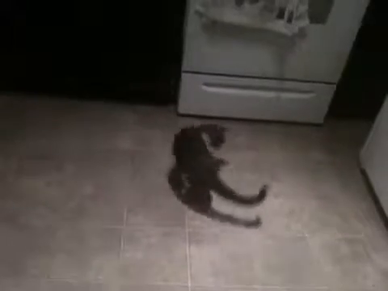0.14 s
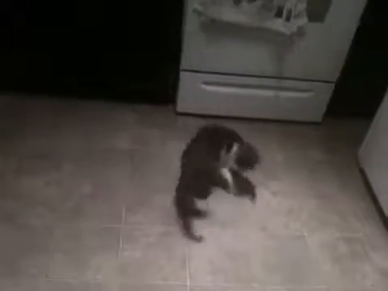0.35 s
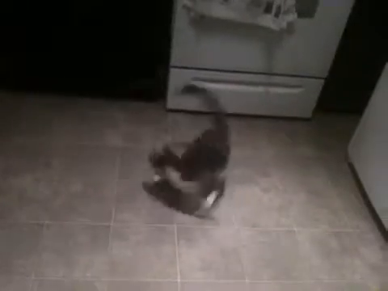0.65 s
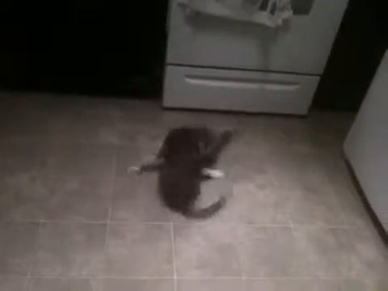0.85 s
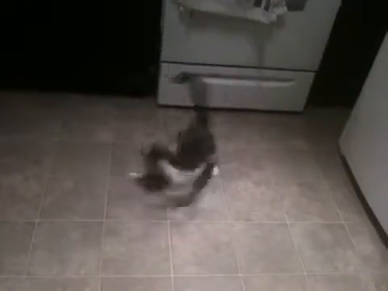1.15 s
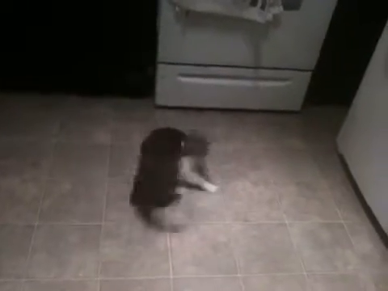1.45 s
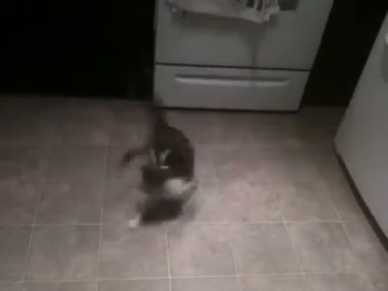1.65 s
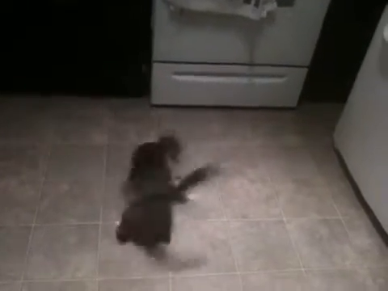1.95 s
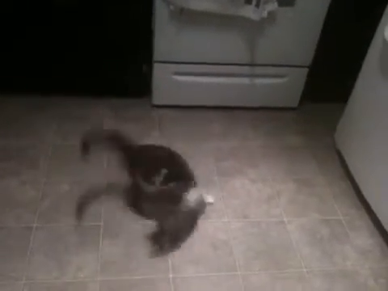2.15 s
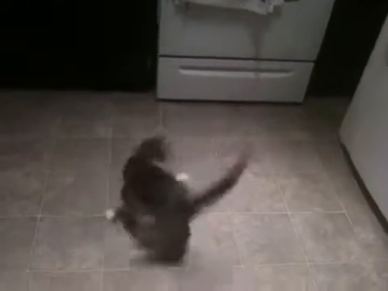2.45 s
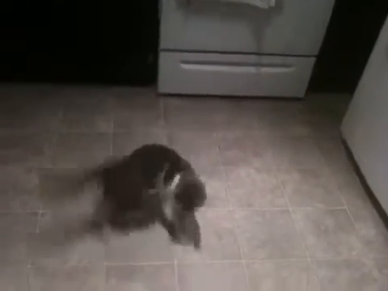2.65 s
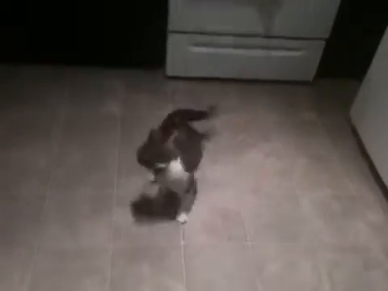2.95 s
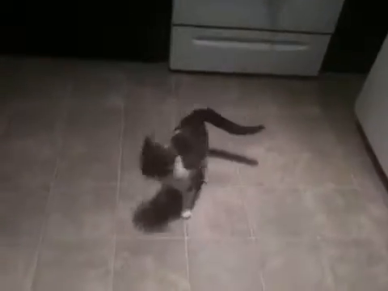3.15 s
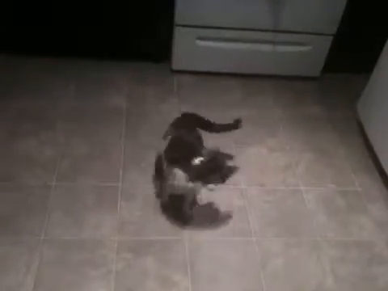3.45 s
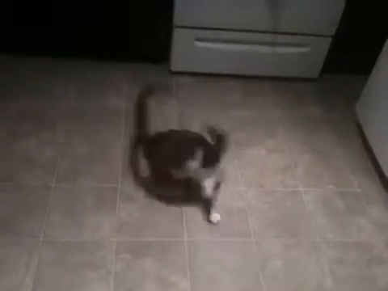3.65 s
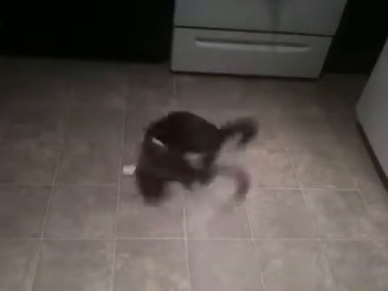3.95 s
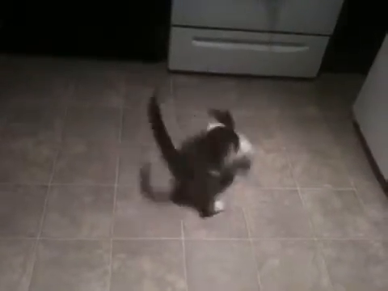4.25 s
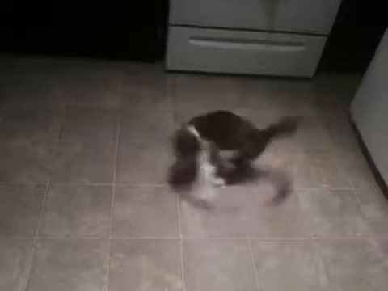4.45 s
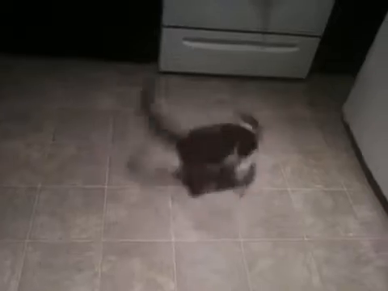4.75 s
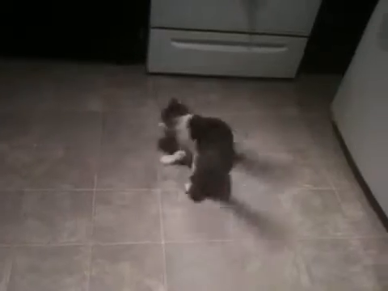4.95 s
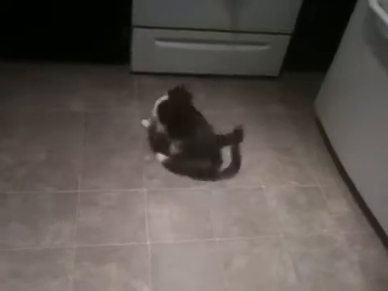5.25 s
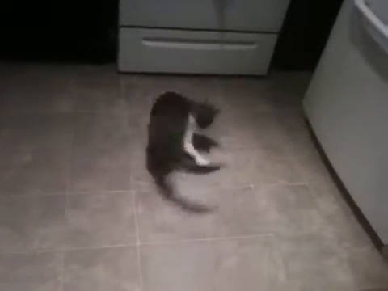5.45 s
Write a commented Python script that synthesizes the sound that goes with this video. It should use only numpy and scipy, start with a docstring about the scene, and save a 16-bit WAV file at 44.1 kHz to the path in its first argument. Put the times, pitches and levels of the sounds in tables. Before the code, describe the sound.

A high, tinny collar bell jingles in quick uneven flurries while a cat's paws patter, thud and scuff on a hard kitchen floor.

```python
"""A cat's collar bell jingles as it chases its tail on a tiled kitchen floor: pellet blows excite split modes.
Claws and the bell's pellet tick as snaps with short noise scatters; paws thud by ringing floor modes.
Pads scuff as grainy friction noise; a squeak and a late squeal are wavering tones.
Three alternating reverberant tails give the room, and coloured hiss, mains hum, a thin electric whine
and the microphone's faint rumble lie beneath."""
import sys
import numpy as np
from scipy import signal
from scipy.fft import rfft, irfft
from scipy.io import wavfile
from scipy.ndimage import uniform_filter1d

SR = 44100
rng = np.random.default_rng(int(sys.argv[2]) if len(sys.argv) > 2 else 0)


def voltage_ratio(decibels):
    """Convert decibels (scalar or array-like) to amplitude ratios, 20 dB per decade."""
    exponent = np.asarray(decibels, float) / 20
    return 10 ** exponent


def digitize_waveform(pressure):
    """Quantize a signal to 16-bit integers and store it at the path in sys.argv[1].

    Rows of a 2-D input are taken as channels; values are limited to [-1, 1].
    """
    field = np.atleast_2d(pressure).T
    bounded = np.clip(field, -1, 1)
    quanta = np.round(bounded * 32767).astype(np.int16)
    wavfile.write(sys.argv[1], SR, quanta)


N = 246959
T = np.arange(N) / SR

# shaking of the pellet between clear blows, also followed by the shuffle: start_s, level_db
SHAKING = [(0.25, -81), (0.44, -64.5), (0.62, -78), (0.9, -66.5), (1.15, -52.5), (1.68, -49.5), (1.84, -59),
           (2.02, -67), (2.22, -49), (2.42, -59), (2.55, -41.5), (3.08, -67), (3.29, -55.5), (3.55, -59),
           (3.78, -49.5), (3.89, -63), (4.0, -55), (4.26, -61), (4.42, -49.5), (4.84, -61), (4.96, -70.5),
           (5.07, -61.5), (5.2, -88), (5.6, -74)]
# spectrum of a small hard tick: frequency_hz, level_db
TICK_COLOUR = [(3000, -19), (5000, 15), (6500, 26), (8000, 20.5), (11000, 6), (14000, 6), (17000, -44)]


def evened(x):
    """Normalization: scales a signal to unit rms."""
    return x / np.sqrt(np.mean(x ** 2) + 1e-20)


def wander(size):
    """Low-pass noise: a moving average over size samples leaves slow random motion, rms 1."""
    return evened(uniform_filter1d(rng.standard_normal(N), size))


def read(points, hz):
    """Interpolation: reads a spectrum table on a log-frequency axis."""
    f, value = np.transpose(points)
    return np.interp(np.log(hz + 1), np.log(f + 1), value)


def curve_gain(rows):
    """Envelope: a level curve as gain per sample, silent outside its span."""
    s, db = np.transpose(rows)
    return voltage_ratio(np.interp(T, s, db, left=-200, right=-200))


def coloured(colour, size):
    """Spectral shaping: white noise filtered by a spectrum table, rms 1."""
    hz = np.fft.rfftfreq(size, 1 / SR)
    spectrum = rfft(rng.standard_normal(size)) * voltage_ratio(read(colour, hz))
    return evened(irfft(spectrum, size))


def ring(hz, db, t60, rise):
    """Damped resonance: one mode starts softly and decays exponentially."""
    t = np.arange(SR // 4) / SR
    decay = voltage_ratio(db - 60 * t / t60)
    onset = 1 - np.exp(-(t / rise) ** 2)
    return decay * onset * np.sin(2 * np.pi * hz * t)


def add(mix, s, sound):
    """Superposition: adds a sound at a time in seconds."""
    part = mix[round(s * SR):][:len(sound)]
    part += sound[:len(part)]


def burst(colour, t60):
    """Decaying noise: a short puff of coloured noise."""
    return coloured(colour, size=4096) * voltage_ratio(-60 * np.arange(4096) / SR / t60)


def background():
    """Stationary noise and tones: hiss with room air, a fuzzy whine and slightly wavering hum."""
    # hiss and room air: frequency_hz, level_db
    hiss = [(24, -80), (40, -29), (107, -5), (174, 3.5), (213, -3), (570, -6), (631, -4.5), (698, -13.5),
            (923, -12.5), (1650, -16), (2350, -15.5), (5160, -18), (17000, -20)]
    # narrow-band electric whine: frequency_hz, level_db
    whine = [(14800, -40), (14950, -12), (14970, 0), (15000, -10), (15030, 0), (15090, -10), (15250, -40)]
    # mains hum harmonics: frequency_hz, level_db
    hum = [(120, -85.5), (180, -100), (240, -90.5)]
    out = voltage_ratio(-69.5) * coloured(hiss, N) + voltage_ratio(-82.0) * coloured(whine, N)
    for hz, db in hum:
        waver_db = 3.6 * wander(3000)
        out += np.sqrt(2) * voltage_ratio(db + waver_db) * np.sin(2 * np.pi * (hz * T + rng.random()))
    return out


def bell():
    """Modal excitation: each blow drives the modes by its own shares, then small random blows follow."""
    # clear blows of the pellet: start_s, level_db, upper_twin_db (drive re level_db)
    strikes = [(0.2902, -48, -5), (0.5587, -49.5, -5), (0.682, -33.5, 12.5), (0.6977, -32.5, -6),
               (0.7446, -32.5, 4), (0.7879, -32.5, 4), (0.8017, -36, 8), (0.9298, -46, 11),
               (1.0072, -26, -3), (1.0296, -26, -4), (1.0361, -28, 0), (1.0534, -29, -1), (1.0822, -29, 3),
               (1.1504, -16, -21), (1.1968, -22.5, -10), (1.2268, -39, -10), (1.2571, -24.5, -10),
               (1.326, -27, -4), (1.3471, -31, 12), (1.3581, -28, -15), (1.3895, -38, -21),
               (1.4703, -32.5, 0), (1.5206, -29, -1), (1.6434, -33, -11), (1.6592, -29.5, -5),
               (1.752, -27.5, -12), (1.9435, -54, -1), (1.759, -23, 5.5), (2.0058, -33, -10),
               (2.0488, -25.5, 5), (2.0567, -23, -5), (2.1859, -35, -8), (2.2035, -22, -13),
               (2.2086, -23.5, -16), (2.2299, -32, -16), (2.258, -24, 9), (2.2892, -18.5, 1.5),
               (2.3842, -20, 11), (2.3879, -21, 12), (2.3935, -26.5, 19), (2.4204, -32, -15),
               (2.4449, -25.5, 18), (2.4606, -53, -6), (2.5401, -29.5, -33), (2.7322, -26.5, 4),
               (2.7701, -24, -19), (2.8011, -25, -16), (2.932, -27.5, 6.5), (2.964, -32, 1),
               (2.9885, -25, -14), (2.994, -22, -12), (3.0507, -24.5, -13), (3.0663, -29, -4),
               (3.1728, -32, -12), (3.1894, -29.5, -20), (3.2384, -22.5, 4), (3.2737, -25.5, -8),
               (3.3053, -29, -16), (3.4491, -31.5, -6), (3.5154, -33, -3), (3.5443, -32, -11),
               (3.7159, -24.5, -14), (3.7261, -33.5, -17), (3.8857, -27.5, 3.5), (3.9236, -27, 0),
               (3.9884, -31, 4), (4.0397, -28, -5), (4.1537, -41, -8), (4.2209, -31.5, -2),
               (4.2388, -28.5, -8), (4.3881, -24, -3.5), (4.4128, -21.5, 1), (4.443, -29, 8),
               (4.497, -31.5, 4), (4.5317, -38, -2), (4.6271, -38, -2), (4.6396, -32, -14),
               (4.751, -41.5, -3), (4.777, -44, 9), (5.008, -53, -5), (5.05, -40.5, -5), (5.4181, -53, -3)]
    # the slit shell splits each mode in two: frequency_hz, level_db, ring_time_factor
    modes = [(6480, 0, 1.), (6800, -1, .9), (15030, -32, 1.5), (15420, -36, 1.2)]
    even_t60_s, halving_db = 0.02, 13  # the ring time halves as the upper twin gains halving_db
    out, shaking = np.zeros(N), curve_gain(SHAKING)
    for s, db, twin_db in strikes:
        t60 = even_t60_s * 2 ** (-twin_db / halving_db)
        upper_pair_db = 8.1 * rng.standard_normal(2)
        drives = db + np.array([0, twin_db, *upper_pair_db])
        for (hz, own_db, factor), drive_db in zip(modes, drives):
            add(out, s, ring(hz, own_db + drive_db, t60 * factor, rise=0.0008))
        # the pellet bounces on after the blow
        add(shaking, s + 0.004, voltage_ratio(db - 7 - 60 * T[:SR // 4] / 0.05))

    # random impacts, 700 per second on average
    hits = (rng.random(N) < 700 / SR) * voltage_ratio(3.2 * np.minimum(rng.exponential(1, N), 2))
    small = voltage_ratio(-20) * evened(hits) * shaking
    shares_db = [1.0, -3.0, -1.0, -13]
    for (hz, own_db, factor), share_db in zip(modes, shares_db):
        spot = rng.standard_normal(N)  # where the pellet lands sets how much each mode gets
        mode = ring(hz, own_db + share_db, 0.022 * factor, 0.0003)
        out += signal.oaconvolve(small * spot, mode)[:N]
    clicks = signal.oaconvolve(small, burst(TICK_COLOUR, 0.021))[:N]
    return out + voltage_ratio(-21.5) * clicks


def scuff():
    """Sliding friction: grainy noise joins a dull rub of pads to a bright rustle of fur and claw tips."""
    # pads and fur sliding on the tiles: start_s, rub_db, rustle_db (re rub), rise_s, fade_t60_s
    slides = [(0.38, -60, -16, 0.014, 0.33), (0.64, -69, 1, .02, 1), (1.041, -57, -2, 0.0061, 0.22),
              (1.751, -55, -12, 0.0067, 0.17), (2.42, -64, -4, 0.012, 0.25), (3.671, -66, -27, .015, 0.44),
              (3.885, -62.5, 5.5, 0.014, 0.22), (4.228, -65, 15, 0.0042, 0.12),
              (4.335, -78, 16, 0.0052, 0.22), (4.408, -67, 3, 0.02, 0.26), (4.59, -78, 20, 0.016, 0.17),
              (4.70, -60.5, -4, 0.019, 0.23), (4.833, -78.5, 20.5, 0.0093, 0.29),
              (5.008, -58, -1, 0.012, 0.3), (5.108, -52.5, -21, .004, 0.25), (5.235, -51, -24, 0.044, 0.62)]
    # spectrum of the rub: frequency_hz, level_db
    rub_colour = [(80, -16.5), (250, 5.5), (600, -3.5), (1200, -4.5), (1800, -8), (2500, -10),
                  (4000, -18.5), (8000, -31)]
    # spectrum of the rustle: frequency_hz, level_db
    rustle_colour = [(2500, -10), (4000, 1), (6000, -2), (9000, -5.5), (14000, -22.5)]
    # between slides the shuffle follows the shaking, with its decibels compressed
    s, db = np.transpose(SHAKING)
    shuffle = curve_gain(np.c_[s, 0.27 * db])
    rub, rustle = voltage_ratio(-62.5) * shuffle, voltage_ratio(-58) * shuffle
    t = T[:SR]
    for s, db, rustle_db, rise, fade in slides:
        slide = np.minimum(t / rise, 1) * voltage_ratio(db - 60 * t / fade)
        add(rub, s, slide)
        add(rustle, s, voltage_ratio(rustle_db) * slide)
    grain = voltage_ratio(1.5 * wander(300))
    return evened(grain) * (rub * coloured(rub_colour, N) + rustle * coloured(rustle_colour, N))


def paws():
    """Impact resonance: soft pushes ring the floor modes nearest each fall's pitch; pads add a slap."""
    # paw falls: start_s, level_db, pitch_hz, slap_db (re level_db)
    falls = [(0.387, -51, 452, 1.5), (0.498, -50, 189, -22), (0.63, -43, 275, -26), (0.648, -59, 244, -13),
             (0.8, -47, 312, -11), (0.861, -54, 186, -17), (0.913, -56.5, 199, -2.5),
             (0.976, -46, 340, -10.5), (1.003, -42, 350, -22), (1.046, -40.5, 333, -10.5),
             (1.078, -42.5, 181, -10), (1.17, -48.5, 318, -14.5), (1.204, -43, 305, -9),
             (1.265, -61.5, 433, 7), (1.348, -34.5, 343, -19), (1.513, -50, 299, -18),
             (1.617, -39.5, 190, -13.5), (1.756, -44, 462, -10.5), (1.765, -35, 307, -41),
             (1.87, -44.5, 284, -6), (1.994, -43, 477, -13.5), (2.071, -51, 310, -12),
             (2.172, -50, 186, -8), (2.236, -40, 306, -16.5), (2.435, -42, 320, -8.5),
             (2.586, -46.5, 263, -9.5), (2.719, -44, 195, -7.5), (2.789, -50, 306, -18),
             (2.878, -50, 194, -23), (2.949, -53, 146, -19), (3.018, -51, 392, -12),
             (3.682, -44.5, 302, -1), (3.76, -46.5, 188, -16), (3.816, -44, 310, -20),
             (3.895, -45, 318, -15), (3.921, -35, 335, -13), (4.062, -41, 313, -12.5),
             (4.171, -40, 367, -30), (4.206, -45.5, 192, -24), (4.343, -49.5, 320, -18),
             (4.393, -46, 330, -10.5), (4.425, -46, 318, -4), (4.581, -48.5, 127, -30),
             (4.692, -44.5, 164, -18), (4.71, -41.5, 272, -9), (4.858, -56, 267, -22),
             (5.012, -45.5, 204, -15), (5.091, -37.5, 159, -35), (5.112, -52.5, 225, 1),
             (5.231, -56, 200, -1), (5.477, -53, 154, -13), (5.538, -52.5, 342, -8)]
    # hollow floor under the tiles: frequency_hz, level_db, t60_s
    floor_modes = [(127, -8, 0.17), (151, -4.5, 0.069), (189, -2, 0.15), (269.3, 1.5, 0.05),
                   (304.4, -3, 0.13), (340, -8, 0.11), (391, 0, 0.04), (577, -3, 0.079), (728, -8, 0.2)]
    # spectrum of the slap: frequency_hz, level_db
    slap_colour = [(300, 8.5), (700, 11.5), (1200, 3.5), (2200, -5.5), (4000, -12), (8000, -42)]
    pushes, out = np.zeros((len(floor_modes), N)), np.zeros(N)
    pad = np.hanning(90)  # a pad lands over 2 ms
    for s, db, hz, slap_db in falls:
        for push, mode in zip(pushes, floor_modes):
            luck = rng.standard_normal()
            near_db = -9 * abs(np.log2(mode[0] / hz)) + 1.86 * luck
            add(push, s + 0.003935 * abs(luck), voltage_ratio(db + near_db) * pad / pad.sum())
        add(out, s, voltage_ratio(db + slap_db - 3) * burst(slap_colour, 0.12))
    for push, mode in zip(pushes, floor_modes):
        out += signal.oaconvolve(push, ring(*mode, rise=0.0015))[:N]
    return out


def snap(colour):
    """Impulse response: one clean click of the given colour, peak 1."""
    spectrum = voltage_ratio(read(colour, np.fft.rfftfreq(4096, 1 / SR)))
    click = np.roll(irfft(spectrum), 40)
    return click / click.max()


def hard_ticks():
    """Hard impact: a clean snap and a short scatter, each with its own share of duller knock."""
    # hard ticks, claw on glaze or pellet on shell: start_s, level_db, knock_db (re level_db)
    ticks = [(0.836, -44, -8), (1.0002, -40.5, -14), (1.1484, -41, -23), (1.3014, -47, -15),
             (1.5265, -40.5, -20), (1.7534, -44.5, -20), (1.8664, -50, -3), (2.204, -45, -22),
             (2.258, -42, -24), (2.3332, -42, -19), (2.384, -44.5, -23), (2.5501, -41.5, -1.5),
             (2.7696, -47.5, -16), (2.8003, -45, -23), (2.931, -43.5, -26), (2.9881, -44, -16),
             (3.047, -55, -5), (3.27, -61, -22), (3.6331, -49.5, -12), (3.883, -51, -25), (4.1564, -48, -6),
             (4.232, -49.5, -7), (4.339, -49, -19), (4.6356, -49, -14), (4.9574, -57.5, -9),
             (5.5387, -62, -7.5)]
    # spectrum of the duller knock: frequency_hz, level_db
    knock_colour = [(300, -16), (1000, -4), (2500, -1), (5000, 0), (8000, -12)]
    even_t60_s, halving_db = 0.011, 16  # the scatter time halves as the knock gains halving_db
    out = np.zeros(N)
    for s, db, knock_db in ticks:
        t60 = even_t60_s * 2 ** (-knock_db / halving_db)
        tick = voltage_ratio(6) * snap(TICK_COLOUR) + voltage_ratio(-1) * burst(TICK_COLOUR, t60)
        knock = voltage_ratio(6) * snap(knock_colour) + voltage_ratio(-1) * burst(knock_colour, t60)
        add(out, s, voltage_ratio(db) * (tick + voltage_ratio(knock_db) * knock))
    return out


def squeak():
    """Frequency modulation: a thin rising tone wobbles in pitch and flickers in level as a pad turns."""
    # path of the squeak: start_s, pitch_hz, level_db
    path = [(4.529, 2020, -91), (4.562, 2085, -80), (4.62, 2210, -79), (4.67, 2230, -92)]
    s, hz, db = np.transpose(path)
    level = voltage_ratio(np.interp(T, s, db)) * (T > s[0]) * (T < s[-1])
    level *= abs(wander(400))
    pitch_hz = np.interp(T, s, hz) + 30 * wander(300)
    return np.sqrt(2) * level * np.sin(2 * np.pi * np.cumsum(pitch_hz) / SR)


def squeal():
    """Stick-slip: a pad's fast, uneven slip in the last long slide gives fuzzy overtones that swell and fade."""
    # high overtones: multiple_of_slip_rate, level_db
    overtones = [(3.5, 0), (4, 4), (5, -5), (6, -5), (7, -9)]
    start_s, length_s, slip_hz, waver_hz = 5.245, 0.27, 1500, 7
    swell = np.sin(np.pi * np.clip((T - start_s) / length_s, 0, 1) ** 0.74)
    phase = 2 * np.pi * np.cumsum(slip_hz + waver_hz * wander(150)) / SR
    out = np.zeros(N)
    for multiple, db in overtones:
        flicker = wander(160)
        out += voltage_ratio(db) * flicker * np.sin(multiple * phase)
    return np.sqrt(2) * voltage_ratio(-72.5) * swell * out


def kitchen(x):
    """Reverberation: sparse taps of random sign, one in every 20 samples, each band dying at its own rate."""
    # decay of the room: frequency_hz, t60_s
    decay = [(150, 0.29), (500, 0.55), (2000, 0.04), (6500, 0.31), (15000, 0.24)]
    taps, at = np.zeros(SR), np.arange(200, SR - 20, 20)
    taps[at + rng.integers(0, 20, len(at))] = rng.choice([-1., 1.], len(at))
    hz, t, z = signal.stft(taps, SR, nperseg=256)
    fading = z * voltage_ratio(-60 * t / read(decay, hz)[:, None])
    tail = signal.istft(fading, SR, nperseg=256)[1]
    return signal.oaconvolve(x, tail / np.linalg.norm(tail))[:N]


def scene():
    """Changing reflection paths: the spinning cat turns the bell to other walls, so three tails take turns."""
    ringing = bell()
    floor = paws() + hard_ticks() + scuff() + squeak() + squeal()
    out = ringing + floor + background()
    wet = voltage_ratio(-7) * ringing + voltage_ratio(-8.5) * floor
    for k in range(3):
        # three cosines a third of a cycle apart keep the summed power constant
        turn = np.sqrt(2 / 3) * np.cos(2 * np.pi * (1.285 * T + k / 3))
        out += kitchen(wet * turn)
    return out[None]


def low_pass(x):
    """Removes everything above the highest recorded frequency."""
    return signal.sosfilt(signal.butter(12, 17100, fs=SR, output="sos"), x)


def record(dry):
    """High-pass response: the small microphone keeps a trace of deep bass, over its own faint rumble."""
    cut = signal.butter(8, 108, "high", fs=SR, output="sos")
    rumble_colour = [(20, -11), (45, -6), (90, -2), (130, -42), (200, -92)]  # frequency_hz, level_db
    rumble = voltage_ratio(-93) * coloured(rumble_colour, N)
    mix = signal.sosfilt(cut, dry) + voltage_ratio(-16.5) * dry + rumble
    return low_pass(mix)


dry = scene()
out = record(dry)
digitize_waveform(out)
```